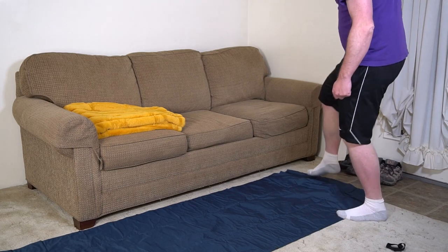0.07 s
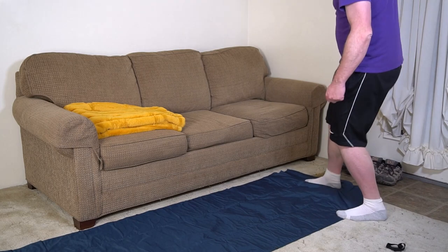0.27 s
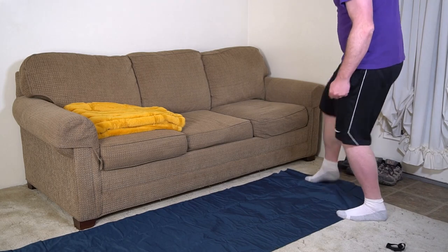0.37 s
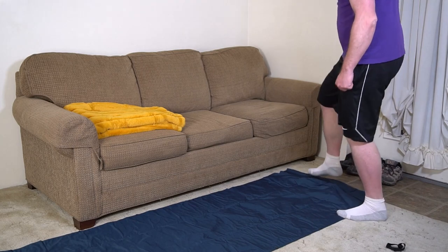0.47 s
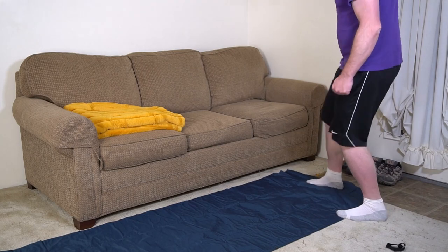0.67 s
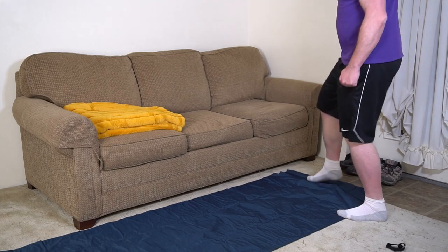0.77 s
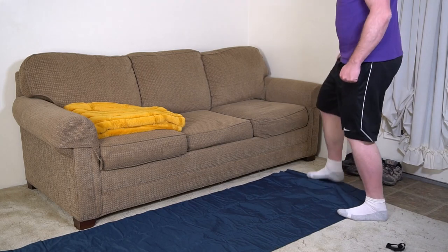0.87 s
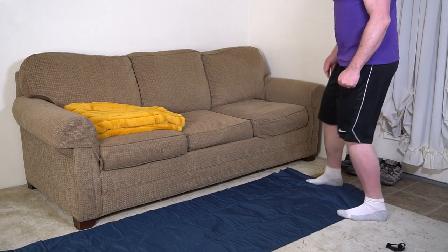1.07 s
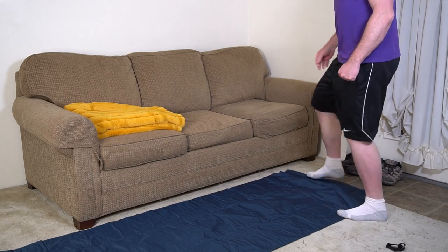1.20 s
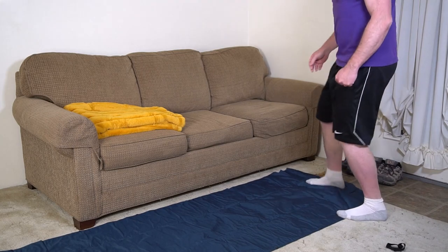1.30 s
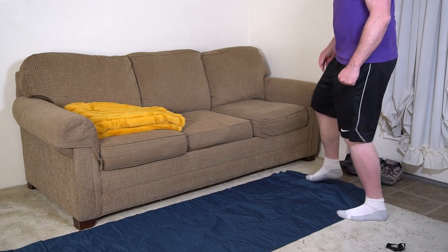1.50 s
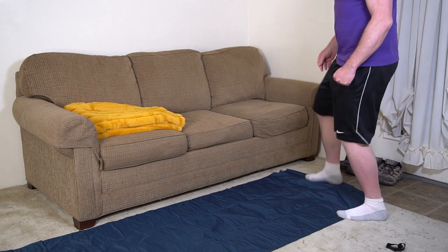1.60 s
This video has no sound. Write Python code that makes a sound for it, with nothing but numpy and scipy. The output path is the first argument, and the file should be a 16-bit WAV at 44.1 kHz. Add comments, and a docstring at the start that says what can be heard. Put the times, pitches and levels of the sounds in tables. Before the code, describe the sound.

A foot treads an inflatable mat's pump, pushing out quick, hollow puffs of air.

```python
"""Living room: a foot treads the built-in pump of an inflatable mat, nearly three times a second.
The sock scuffs the fabric, the chamber buckles with a hollow plop, air rushes through the valve.
The skin snaps taut with a chuff; the foot thumps the floor through the mat.
Between strokes the foam swells back, drawing air in under the crinkling skin."""
import sys
import numpy as np
from scipy import signal
from scipy.fft import rfft, irfft
from scipy.io import wavfile

SR = 44100
rng = np.random.default_rng(int(sys.argv[2]) if len(sys.argv) > 2 else 0)


def store_wav(level_fs):
    """Save 16-bit WAV to argv[1]."""
    pcm = np.round(np.clip(np.atleast_2d(level_fs), -1, 1) * 32767)
    wavfile.write(sys.argv[1], SR, pcm.T.astype(np.int16))


N = 72765

# Down strokes (start [s], attack [s], hold [s], thud [dB], chamber [dB], rush [dB], hiss [dB])
STROKES = [(-0.035, 0.014, 0.027, -52.5, -32.5, -42.5, -55.5),
           (0.252, 0.017, 0.033, -42.5, -23, -31, -36.5), (0.606, 0.025, 0.032, -48, -21.5, -26, -36.5),
           (0.974, 0.019, 0.029, -46.5, -28, -28, -42), (1.338, 0.019, 0.029, -51, -25.5, -30, -40.5)]
# Fabric scuffs (start [s], attack [s], hold [s], bump [dB], rub [dB], swish [dB])
SCUFFS = [(0.155, .008, 0.036, -46.5, -43.5, -79), (0.208, 0.023, 0.016, -27.5, -28.5, -52.5),
          (0.495, 0.0023, 0.0034, -45.5, -41, -75), (0.556, 0.023, 0.027, -32, -38, -64),
          (0.586, 0.0056, 0.015, -30, -26.5, -47), (0.858, 0.015, 0.013, -58, -42.5, -76),
          (0.895, 0.056, 0.052, -35, -35, -57), (1.255, 0.048, 0.03, -36.5, -37, -58),
          (1.620, 0.035, .020, -37.5, -30, -47)]
# Sock slides (start [s], attack [s], hold [s], centre [Hz], level [dB])
SLIDES = [(0.226, 0.029, .02, 10500, -47.5), (0.265, .015, 0.019, 13000, -40),
          (0.362, 0.0077, 0.013, 10800, -52), (0.522, 0.029, 0.074, 8900, -56),
          (0.881, 0.026, 0.058, 9700, -63.5), (1.261, .018, 0.021, 11400, -56.5),
          (1.600, .02, 0.042, 10300, -53.5)]
# Chamber plops (start [s], swell [s], 4 x (pitch [Hz], level [dB])), lowest mode first
PLOPS = [(0.2546, 0.01, 500, -15, 848, -15.5, 993, -13.5, 1423, -29),
         (0.615, .024, 326, -19.5, 361.3, -28.5, 590.3, -28, 692, -22),
         (0.975, 0.014, 508, -23.5, 945, -27.5, 1034, -27.5, 1539, -29.5),
         (1.3400, 0.012, 344.9, -27, 472, -22, 688, -43.5, 962, -33.5)]
# Noise bursts (start [s], attack [s], hold [s], level [dB])
DRAUGHTS = [(0.0, .01, 0.054, -52), (0.295, 0.014, 0.045, -37), (0.42, 0.014, 0.036, -52),
            (0.59, .03, 0.079, -42.5), (0.88, .03, .06, -53.5), (1.22, 0.034, .10, -50)]
REFILLS = [(0.02, 0.026, 0.047, -44.5), (0.31, 0.035, 0.026, -34.5), (0.40, 0.028, 0.036, -47),
           (0.69, 0.02, 0.024, -32.5), (0.79, 0.028, 0.025, -50), (1.05, 0.026, 0.052, -42),
           (1.13, 0.028, .08, -47.5), (1.44, 0.018, 0.026, -37.5), (1.535, 0.0088, 0.012, -43.5)]
LANDINGS = [(0.236, 0.0072, 0.0061, -32.5), (0.301, 0.006, 0.0082, -35), (0.630, 0.0054, 0.0069, -33.5),
            (1.352, .006, 0.0086, -40)]
CHUFFS = [(0.260, 0.0083, 0.012, -19), (0.627, .008, 0.0058, -21), (0.980, 0.0045, 0.024, -26),
          (1.343, 0.0062, 0.014, -31)]

# Noise spectra (frequency [Hz], relative density [dB])
THUD_SPECTRUM = [(15, -16), (32, -1), (60, -12), (85, -9.5), (130, -4), (200, -8.5), (350, -31), (900, -70)]
CHAMBER_SPECTRUM = [(90, -46), (180, -14.5), (270, -4.5), (335, 2), (430, 0), (520, 0), (750, -1.5),
                    (980, -4.5), (1250, -12), (2200, -16.5), (6000, -70)]
RUSH_SPECTRUM = [(200, -28), (600, -4), (1000, -3.5), (1500, -3), (2200, -6.5), (3200, -11), (4800, -13.5),
                 (7000, -19.5), (15000, -41.5)]
HISS_SPECTRUM = [(800, -23), (3000, 4), (5000, -24.5), (7000, -2.5), (10000, -2), (13000, -6.5),
                 (16000, -7)]
BACKGROUND_SPECTRUM = [(20, -0.5), (50, -4.5), (100, -9), (300, -2), (800, -10), (2000, -8), (5000, -25),
                       (15000, -34.5)]
DRAUGHT_SPECTRUM = [(15, -1), (32, 4.5), (55, -8), (90, -15), (250, -45), (1000, -80)]
REFILL_SPECTRUM = [(50, -9), (150, -9), (260, -11.5), (400, -2.5), (700, -5.5), (950, -3.5), (1400, -11),
                   (2300, -14.5), (3800, -27.5), (8000, -35), (15000, -63)]
BUMP_SPECTRUM = [(40, -24), (100, -11), (160, -8), (240, -9.5), (305, 4.5), (380, -6.5), (490, -8),
                 (750, -15), (2500, -51)]
RUB_SPECTRUM = [(100, -44), (300, -11.5), (500, 6.5), (950, 5), (1400, -3), (2200, -10.5), (3500, -18.5),
                (6000, -36.5), (15000, -73)]
SWISH_SPECTRUM = [(1000, -27), (3000, 10), (6000, 10), (9500, 2.5), (12500, -23), (16000, -16)]
LANDING_SPECTRUM = [(40, -21), (80, -11), (125, 0), (170, 3), (230, -3), (500, -47), (2000, -80)]
CHUFF_SPECTRUM = [(200, -27), (450, -10.5), (700, -14), (900, 2), (1150, -1), (1400, -1.5), (1850, -8.5),
                  (2300, -24.5), (5000, -37), (12000, -49)]
# Room decay (frequency [Hz], T60 [s])
ROOM_T60 = [(100, 0.52), (400, 0.41), (1000, 0.36), (3000, 0.41), (8000, 0.33), (15000, 0.39)]

TIME_S, BINS_HZ = np.arange(N) / SR, np.fft.rfftfreq(N, 1 / SR)


def amp(db):
    """dB to gain."""
    return 10 ** (np.asarray(db) / 20)


def unit_rms(x):
    """Scale to rms 1."""
    return x / np.sqrt(np.mean(x ** 2) + 1e-20)


def lookup(table, hz):
    """Interpolate on a log-frequency axis."""
    table_hz, values = np.transpose(table)
    return np.interp(np.log(hz + 1), np.log(table_hz + 1), values)


def coloured(x, bin_gains):
    """Spectral shaping, rms 1."""
    return unit_rms(irfft(rfft(x) * bin_gains, N))


def wander(cutoff_hz):
    """Smooth random drift, rms 1."""
    return coloured(rng.standard_normal(N), np.exp(-(BINS_HZ / cutoff_hz) ** 2))


def texture(spectrum, crinkle_share, crinkles_per_s=900, spread_db=3.5, flutter_db=0.5):
    """Fluttering turbulence plus tiny fabric crinkles in one spectrum, rms 1."""
    sizes = amp(spread_db * np.minimum(rng.exponential(1, N), 4))
    crinkles = sizes * rng.choice([-1, 1], N) * (rng.random(N) < crinkles_per_s / SR)
    turbulence = rng.standard_normal(N)
    drive = np.sqrt(crinkle_share) * unit_rms(crinkles) + np.sqrt(1 - crinkle_share) * turbulence
    flutter = amp(flutter_db * wander(cutoff_hz=70.5))
    return coloured(drive * flutter, amp(lookup(spectrum, BINS_HZ)))


def envelope(events, release_s, layer=0):
    """Power sum of attack-hold-release envelopes; layer picks the level column."""
    power = np.zeros(N)
    for start_s, attack_s, hold_s, *levels_db in events:
        rise = np.clip((TIME_S - start_s) / attack_s, 0, 1) ** 1.18
        fall = np.exp(-np.maximum(TIME_S - start_s - attack_s - hold_s, 0) / release_s)
        power += (amp(levels_db[layer]) * rise * fall) ** 2
    return np.sqrt(power)


def pump():
    """Tread thuds, chamber roars, air rushes and hisses through the valve."""
    thud = texture(THUD_SPECTRUM, crinkle_share=0.3) * envelope(STROKES, release_s=0.043, layer=0)
    roar = texture(CHAMBER_SPECTRUM, crinkle_share=0.4) * envelope(STROKES, release_s=0.022, layer=1)
    rush = texture(RUSH_SPECTRUM, crinkle_share=0.11) * envelope(STROKES, release_s=0.024, layer=2)
    hiss = texture(HISS_SPECTRUM, crinkle_share=0.1) * envelope(STROKES, release_s=0.023, layer=3)
    return thud + roar + rush + hiss


def background(level_db=-52.5):
    """Quiet, steady room noise."""
    return amp(level_db) * texture(BACKGROUND_SPECTRUM, crinkle_share=0)


def draughts():
    """Low puffs of air pushed out from under the mat."""
    return texture(DRAUGHT_SPECTRUM, crinkle_share=0) * envelope(DRAUGHTS, release_s=0.012)


def refills():
    """Foam swells back, drawing air into the crinkling chamber."""
    return texture(REFILL_SPECTRUM, crinkle_share=0.53) * envelope(REFILLS, release_s=0.028)


def scuffs():
    """Foot bumps and rubs the mat's skin."""
    bump = texture(BUMP_SPECTRUM, crinkle_share=0.33) * envelope(SCUFFS, release_s=0.01, layer=0)
    rub = texture(RUB_SPECTRUM, crinkle_share=0.53) * envelope(SCUFFS, release_s=0.01, layer=1)
    swish = texture(SWISH_SPECTRUM, crinkle_share=0.6) * envelope(SCUFFS, release_s=0.01, layer=2)
    return bump + rub + swish


def slides(sigma_octaves=0.63):
    """Sock zips over the nylon weave: a hiss band, higher for a faster slide."""
    out = np.zeros(N)
    for start_s, attack_s, hold_s, centre_hz, level_db in SLIDES:
        band = np.exp(-0.5 * (np.log2((BINS_HZ + 1) / centre_hz) / sigma_octaves) ** 2)
        hiss = coloured(rng.standard_normal(N), band)
        out += hiss * envelope([(start_s, attack_s, hold_s, level_db)], release_s=0.0093)
    return out


def landings():
    """Foot bottoms out on the floor through the mat."""
    return texture(LANDING_SPECTRUM, crinkle_share=0) * envelope(LANDINGS, release_s=0.0076)


def plops(mode_lag_s=0.0023, ring_db=-15, ring_s=0.054, waver_depth=0.03427):
    """Buckling chamber rings in four modes, pitches unsteady as it is squashed."""
    out = np.zeros(N)
    for start_s, swell_s, *modes in PLOPS:
        for k, (pitch_hz, level_db) in enumerate(zip(modes[::2], modes[1::2])):
            age_s = np.maximum(TIME_S - start_s - k * mode_lag_s, 0)
            progress = age_s / swell_s
            pulse = (progress * np.exp(1 - progress)) ** 3.34
            ring = amp(ring_db) * np.minimum(progress, 1) * np.exp(-age_s / ring_s)
            wavering_hz = pitch_hz * (1 + waver_depth * wander(cutoff_hz=85.9))
            cycles = np.cumsum(wavering_hz) / SR + rng.random()
            out += amp(level_db) * (pulse + ring) * np.sqrt(2) * np.sin(2 * np.pi * cycles)
    return out


def chuffs():
    """Slack skin snaps taut over trapped air: a short mid-range burst."""
    return texture(CHUFF_SPECTRUM, crinkle_share=0.26) * envelope(CHUFFS, release_s=0.006)


def room(x, send_db, delay_s=0.006, taps_per_s=3000):
    """Sparse reflections, each band decaying at its own rate."""
    taps = rng.choice([-1., 1.], SR) * (rng.random(SR) < taps_per_s / SR)
    taps *= np.arange(SR) / SR > delay_s
    hz, age_s, bands = signal.stft(taps, SR, nperseg=256)
    decay = amp(-60 * age_s / lookup(ROOM_T60, hz)[:, None])
    _, tail = signal.istft(bands * decay, SR, nperseg=256)
    return signal.fftconvolve(amp(send_db) * x, tail / np.linalg.norm(tail))[:N]


def scene():
    """Mono mix: mat sounds with reflections; low thumps and background without."""
    rustle = pump() + scuffs() + slides() + refills()
    pops = plops() + chuffs()
    echo = room(rustle, send_db=-5) + room(pops, send_db=-8.5)
    mix = amp(-0.5) * (rustle + pops + echo) + landings() + draughts() + background()
    return mix[None]


def record(dry):
    """Steep FIR low-pass."""
    cutoff_hz = 15720
    lowpass = signal.firwin(511, cutoff_hz, window=("kaiser", 9), fs=SR)
    return signal.oaconvolve(dry, lowpass[None], "same")


dry = scene()
out = record(dry)
store_wav(out)
```